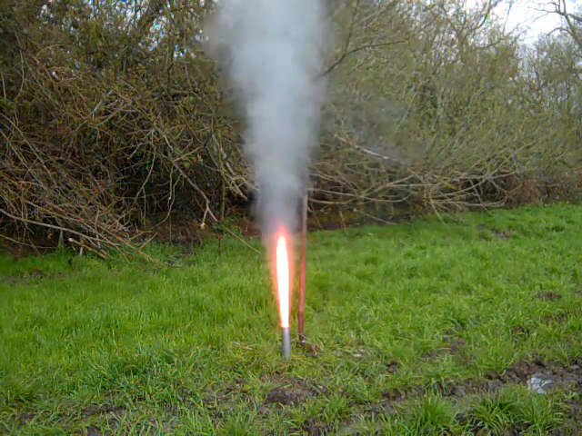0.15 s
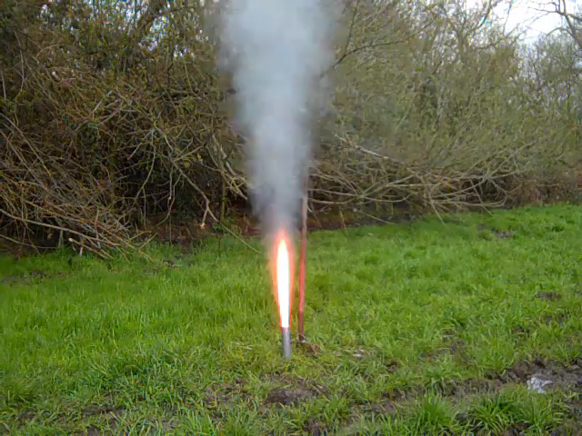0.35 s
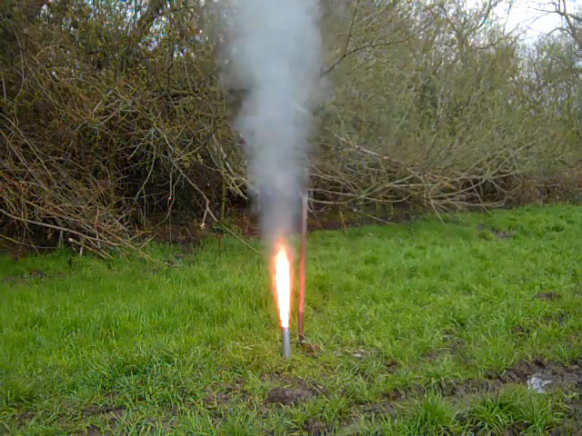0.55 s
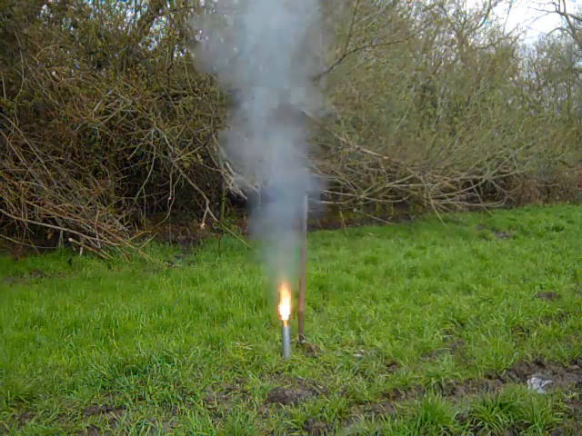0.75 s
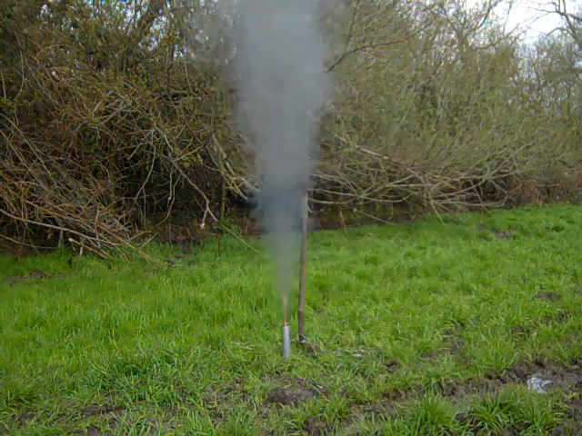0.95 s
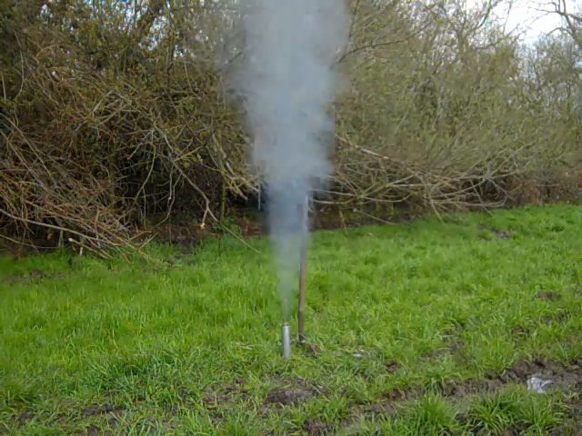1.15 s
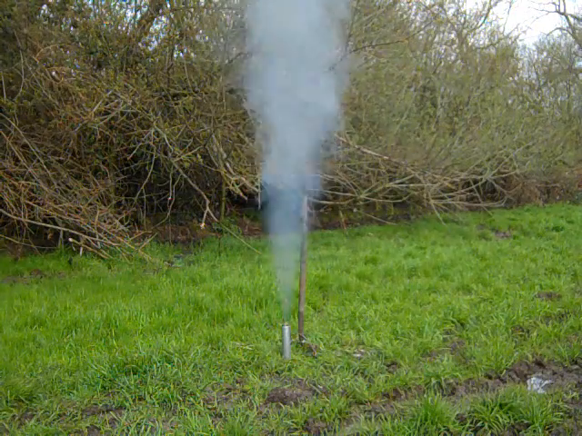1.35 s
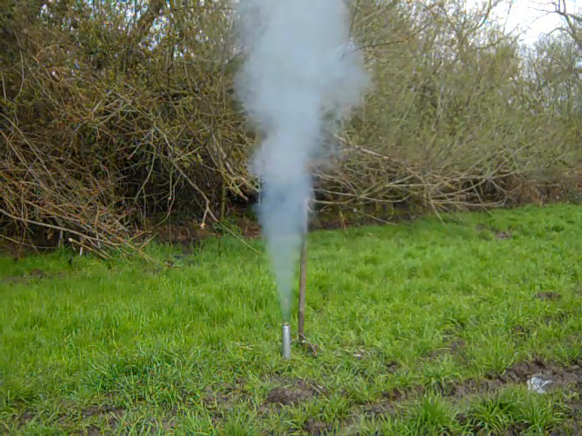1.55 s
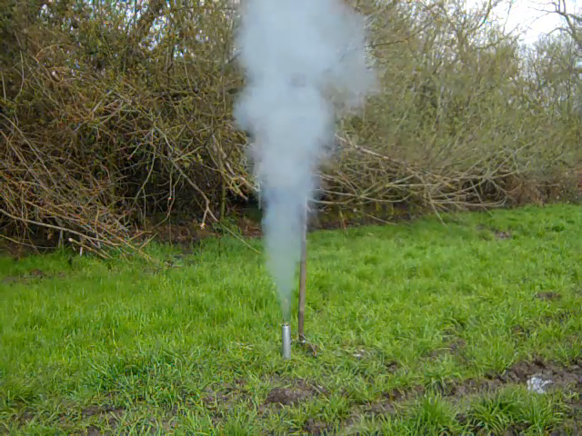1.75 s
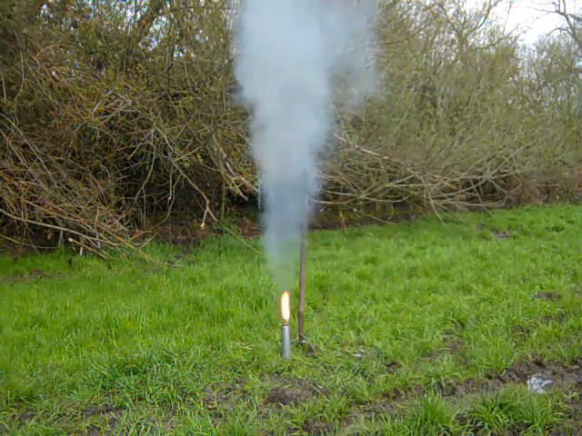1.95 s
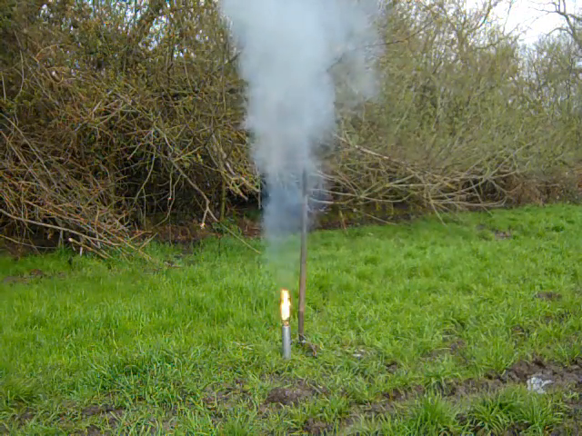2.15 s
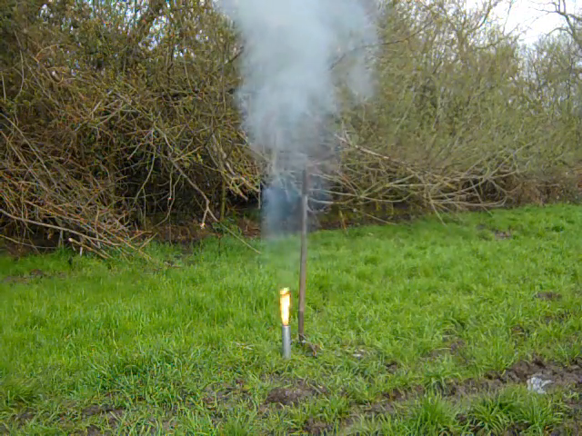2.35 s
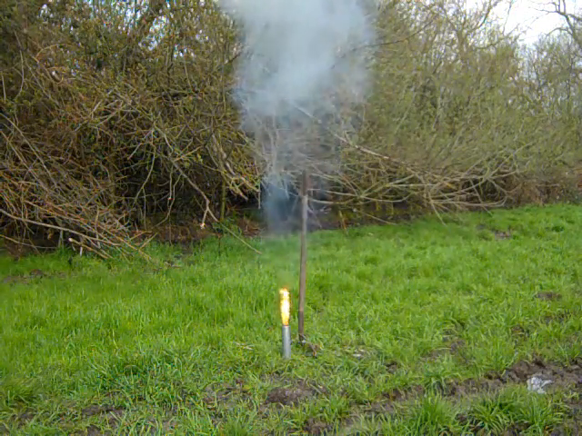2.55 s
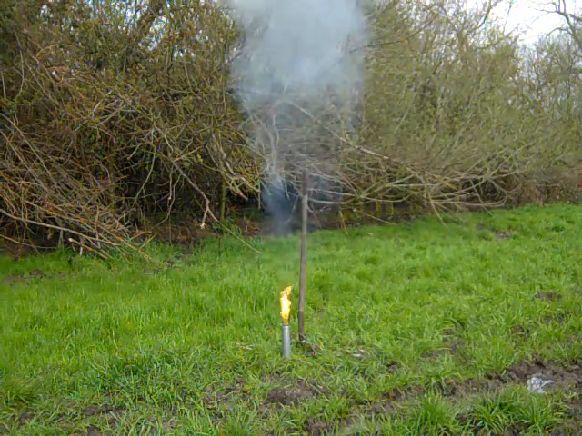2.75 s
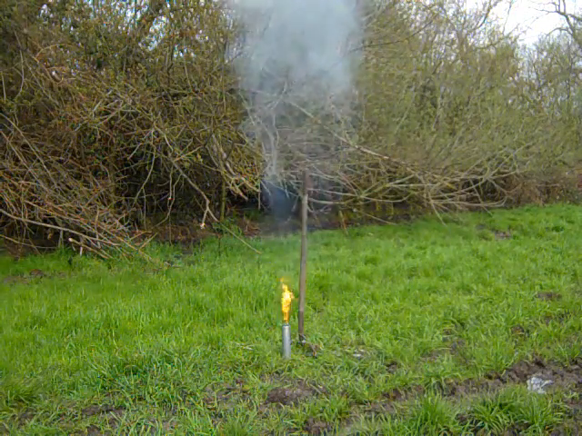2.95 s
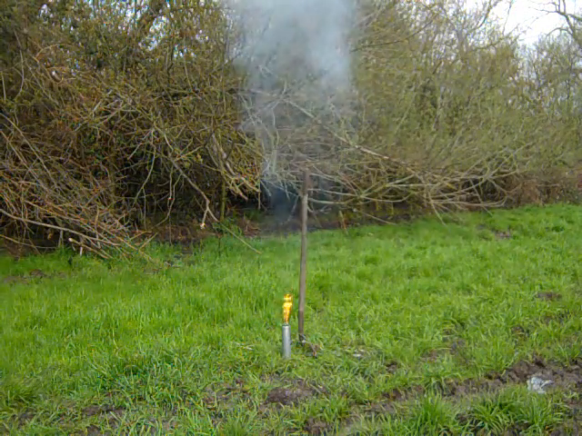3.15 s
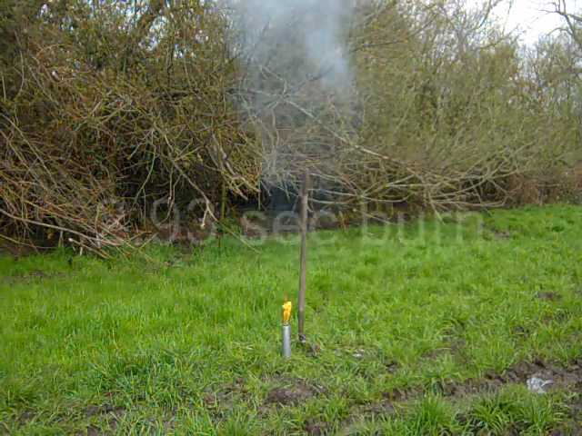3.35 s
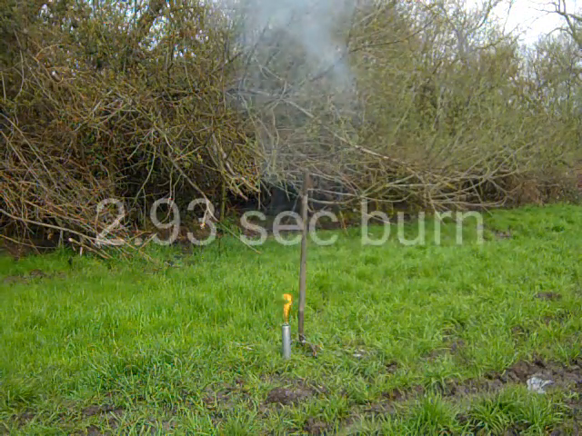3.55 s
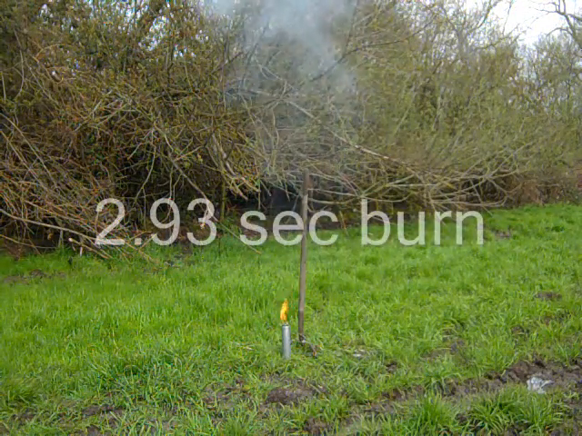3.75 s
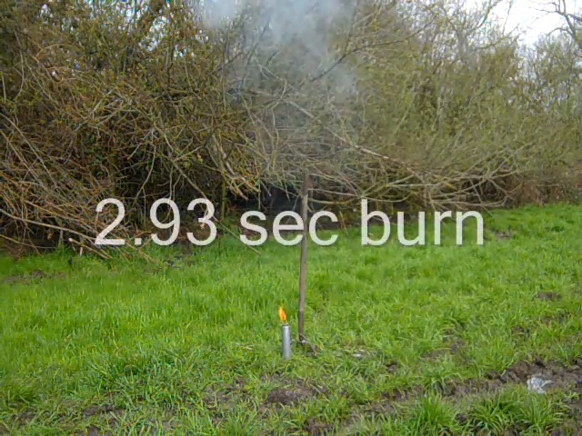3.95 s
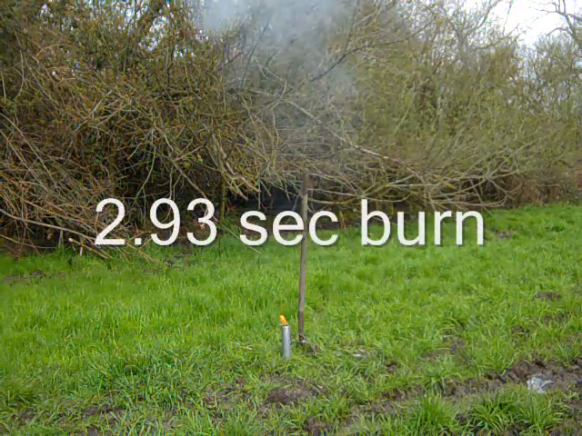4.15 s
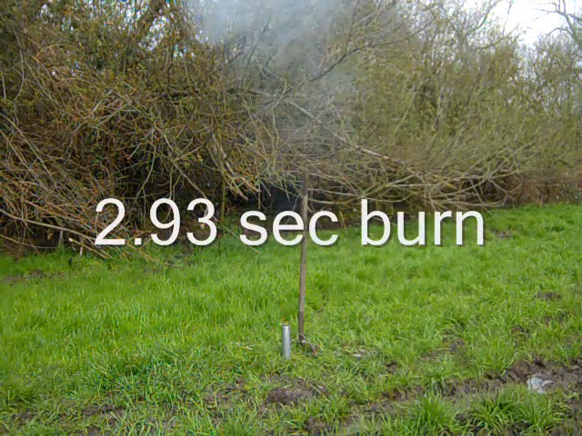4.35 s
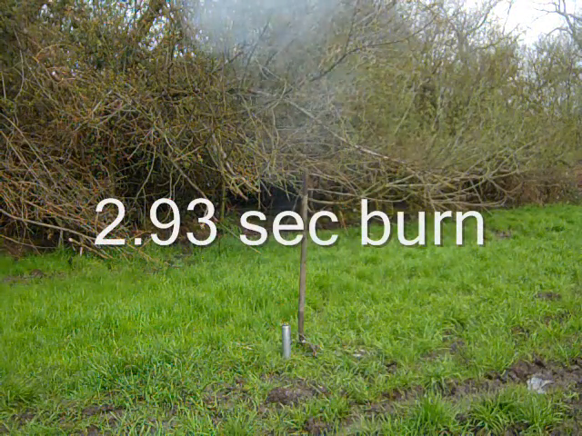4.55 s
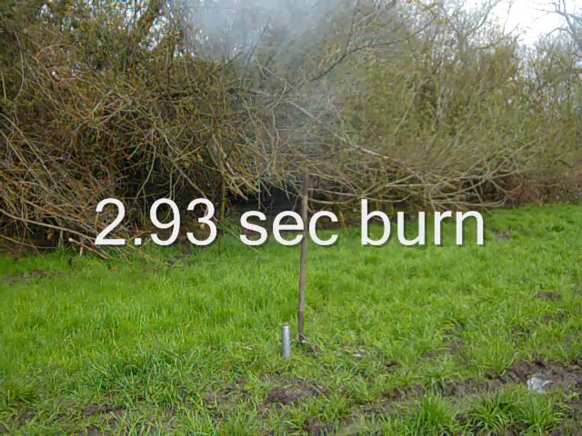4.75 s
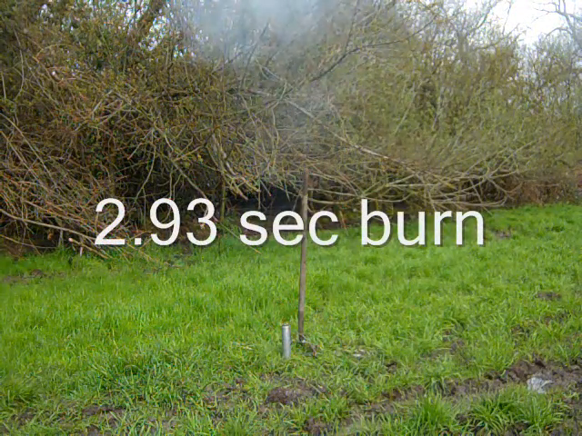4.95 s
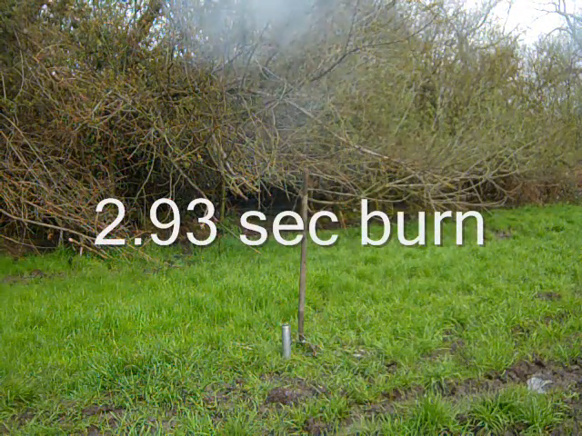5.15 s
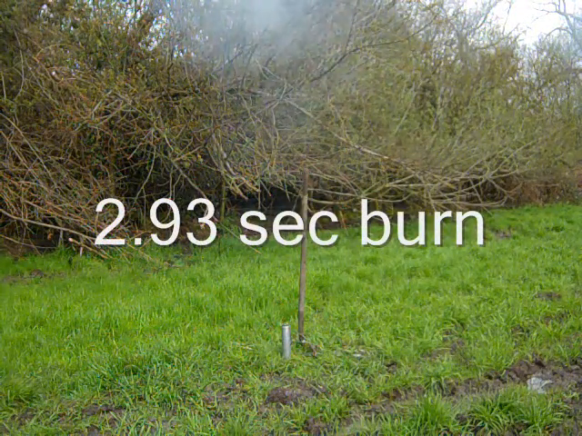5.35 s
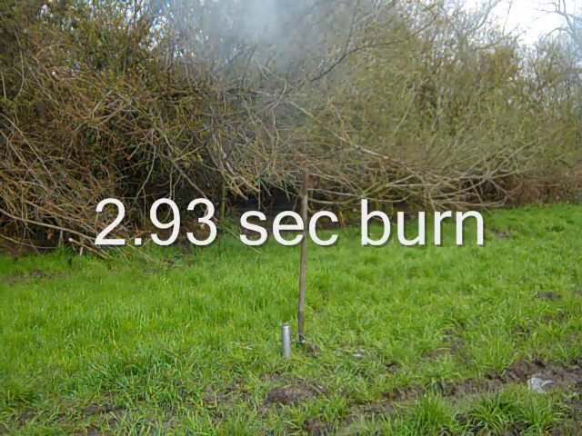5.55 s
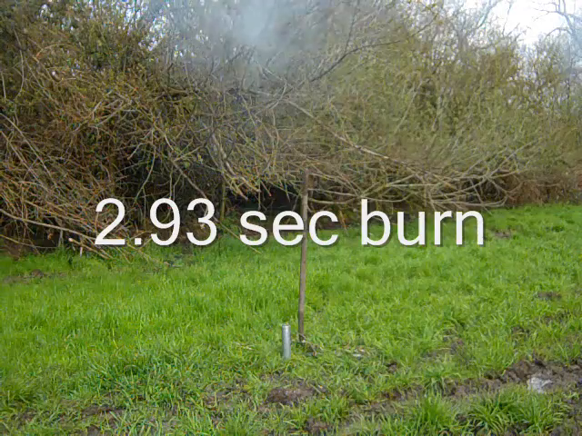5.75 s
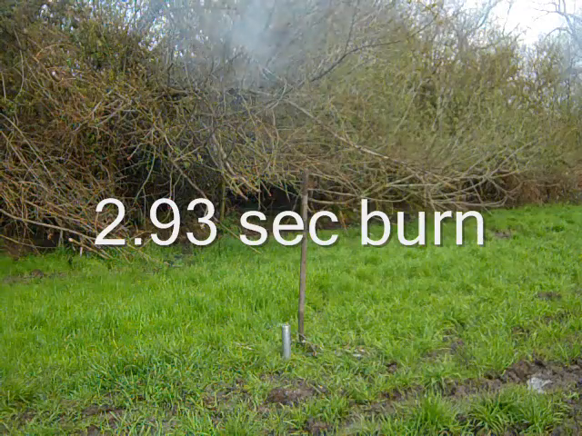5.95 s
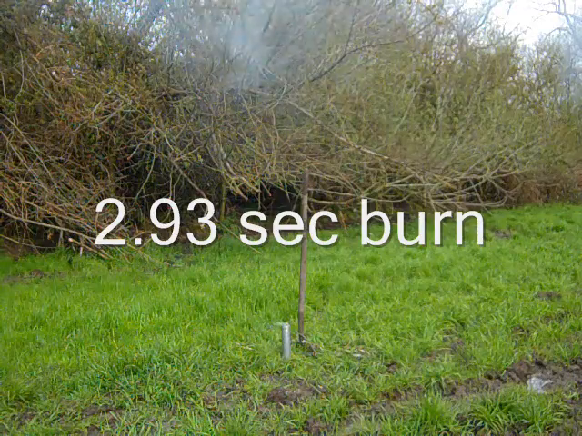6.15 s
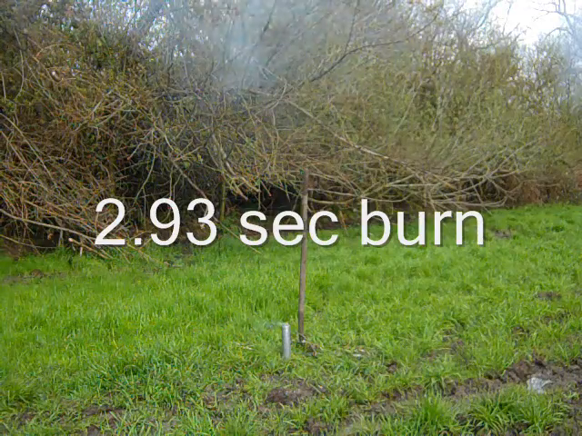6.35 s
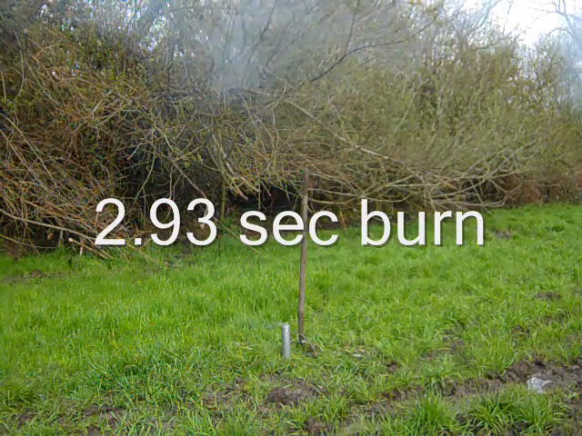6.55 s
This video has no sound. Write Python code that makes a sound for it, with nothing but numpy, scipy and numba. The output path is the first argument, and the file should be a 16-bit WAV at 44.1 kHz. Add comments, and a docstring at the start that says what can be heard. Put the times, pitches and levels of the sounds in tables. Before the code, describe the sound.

Overloaded, crackling jet blast collapses after a second into chuffs and fading hiss, relights with rapid pops, and dwindles into quiet outdoor air.

```python
"""A harsh, overloaded roar comes first: a small solid rocket motor on a stake in a field, some metres from a
pocket camera. The jet is coloured noise under broad, rough overload noise; as it fails it chuffs, then thins to
a hiss with a falling whistle. Leftover gas relights in pops, each one a short puff of pressure. A soft flame
roars in the casing as a stream of small puffs, a few brief hoots follow, and the quiet noise of the field stays."""
import sys
import numpy as np
from scipy import signal
from scipy.fft import rfft, irfft
from scipy.io import wavfile
from scipy.ndimage import uniform_filter1d
from numba import njit

SR = 44100
rng = np.random.default_rng(int(sys.argv[2]) if len(sys.argv) > 2 else 0)


def int16_out(signal):
    """Quantize to a 16-bit WAV file."""
    q = np.round(np.clip(np.atleast_2d(signal).T, -1, 1) * 32767)
    wavfile.write(sys.argv[1], SR, q.astype(np.int16))


N = 291942
HZ = np.maximum(np.fft.rfftfreq(N, 1 / SR), 1)  # every frequency of the spectrum
T = np.arange(N) / SR  # time [s]

# Colour of the quiet field: (frequency [Hz], relative level per Hz [dB])
FIELD_COLOUR = [(25, -8), (60, 0.5), (250, 0.5), (500, -8), (1000, -7), (2000, -12.5), (4000, -19),
                (8000, -21.5), (12000, -30), (20000, -35)]
# How alike left and right hear the field: (frequency [Hz], likeness [0-1])
FIELD_LIKENESS = [(30, .5), (130, 0.97), (290, 0.76), (630, 0.93), (1400, .56), (3000, 0.25), (6500, 0)]
# Short hoots of the last flame in the casing:
# (time of the crest [s], pitch [Hz], level [dB], time from crest to nearly silent [s])
HOOTS = [(3.106, 1460, -40.5, 0.02), (3.262, 1420, -36, 0.011), (3.335, 1430, -55, .05),
         (3.452, 1180, -46, 0.024), (3.477, 1420, -46, 0.018)]
# Level of the lazy flame after relighting: (time [s], level [dB])
FLAME_LEVEL = [(2.0, -48), (2.075, -33), (2.1, -26), (2.2, -21), (2.3, -25), (2.43, -20.5), (2.5, -24),
               (2.6, -24.5), (2.8, -32), (3.07, -43), (3.3, -50.5), (3.9, -60)]
# Chuffs of the failing jet, then relighting pops:
# (time of the crest [s], puff level [dB], strength of the gust of hiss after it [dB])
POPS = [(.99, 2, -20), (1.028, 0, -24), (1.12, -2, -30), (1.172, -8, -30), (1.316, -22, -36),
        (1.797, -37, -28), (1.9024, -1.5, -11), (1.9111, 1, -17), (1.9395, -0.5, -12.5), (1.986, -3.5, -17),
        (2.008, -0.5, -16), (2.024, -4.5, -16.5), (2.032, -21, -17.5), (2.04, -27, -22),
        (2.0539, -1.5, -22), (2.0607, -14, -26), (2.0846, -11, -39), (2.0896, -6, -20), (2.0962, -3.5, -25),
        (2.108, -13, -23), (2.119, -8, -27), (2.125, -13, -32), (2.136, -12, -28), (2.147, -16, -36),
        (2.156, -12.5, -27), (2.1968, -14, -24), (2.236, -10, -22), (2.2537, -15, -35), (2.259, -12.5, -34),
        (2.897, -34, -38), (2.946, -32, -58), (2.973, -33, -59), (3.03, -31, -56), (3.068, -36, -56),
        (3.17, -37, -60), (3.207, -36, -60)]
# Tones the casing tube favours: (frequency [Hz], width of one pass of the filter [Hz], relative level [dB])
CASING_MODES = [(1380, 300, -8.5), (2024, 700, -0.5), (2660, 590, -1.5), (3420, 740, -11),
                (5100, 1800, -9.5)]
# Colour of the rough overload noise, near flat up to the treble: (frequency [Hz], relative level per Hz [dB])
OVERLOAD_COLOUR = [(25, 5.5), (300, 5.5), (1000, 2), (3000, -1), (6000, -29.5)]
# Colour of the jet's hiss: (frequency [Hz], relative level per Hz [dB])
JET_COLOUR = [(300, -24.5), (1200, -21), (2000, -14.5), (2500, -12), (3500, -9.5), (4500, -11), (6000, -5),
              (7500, -3.5), (10000, -9), (14000, -3.5), (20000, 1)]
# How alike left and right hear the jet: (frequency [Hz], likeness [0-1])
JET_LIKENESS = [(300, 1), (3000, 0.6), (7500, 0.98), (11000, 0.39), (14000, .1)]
# Jet level: it climbs to full thrust, drops, swells briefly and dies: (time [s], level [dB])
JET_LEVEL = [(0, 12.5), (.4, 13.5), (.85, 21.5), (.95, 13.5), (1.06, 5.5), (1.19, 2.5), (1.26, -5),
             (1.4, -9.5), (1.7, -12), (1.89, -14), (1.92, -16.5), (2.075, -27), (2.25, -26.5),
             (2.43, -20.5), (2.6, -27), (2.7, -34), (2.8, -55), (3.5, -81)]
# The right microphone port is shaded: (frequency [Hz], loss below the left [dB])
RIGHT_LOSS = [(60, 7.5), (110, 4.5), (200, 5), (380, 5.5), (690, 4.5), (1270, 5), (2340, 7), (4320, 6.5),
              (7950, 11), (14600, 15)]

FIELD_DB = -46.5
RELIGHT_S = 1.9  # the flame moves into the casing
# time scale of a pop; pops are sharp until a moment, then get rounder; each gust dies away
POP_MS, POP_SHARP_UNTIL_S, POP_ROUNDING_S, GUST_DECAY_S = 2.98, 2.005, 0.16, 0.0088
THUD_MS, THUD_DB = 10, -18  # the slow push of air under each pop; level beside the puff
# the nozzle pitch sinks steadily to its rest as the pressure drains
NOZZLE_START_S, NOZZLE_START_HZ, NOZZLE_REST_HZ, NOZZLE_SAG_HZ_PER_S = 1.105, 9700, 7100, 7300
WHISTLE_DB, WHISTLE_SAG_DB_PER_S, WHISTLE_END_S, WHISTLE_EDGE_S = -7, 60, 1.2, 0.018
SMEAR_DB, SMEAR_SAG_DB_PER_S, SMEAR_END_S, SMEAR_EDGE_S = -10, 6, 2, 0.05  # level beside the jet
# casing level beside the jet, before and after it warms; warming time; ceiling
CASING_COLD_DB, CASING_LIT_DB, CASING_WARMS_S, CASING_TOP_DB = -14.5, -2, 0.39, -13
CASING_FLAME_DB = -16.5  # beside the flame
# overload noise at full thrust; its change in dB per dB of jet; its delay behind the jet
OVERLOAD_DB, OVERLOAD_SLOPE, OVERLOAD_LAG_S = 3.5, 1.24, 0.045
# jet at full thrust; jet level under which the overload noise collapses; extra fall in dB per dB
FULL_DB, COLLAPSE_BELOW_DB, COLLAPSE_SLOPE = 18.5, 2, 1.5
PORT_HZ, PORT_WIDTH, PORT_DB = 7810, 960, 8.5  # resonance added by the port [Hz, Hz, dB]
TOP_HZ = 14200  # the camera keeps nothing much above this


def undb(db):
    """Turn decibels into a plain multiplier."""
    return 10 ** (np.asarray(db) / 20)


def unit(x):
    """Scale a sound to an average strength (rms) of 1."""
    return x / np.sqrt(np.mean(x ** 2))


def over_hz(table):
    """Read a (frequency, value) table at every frequency, on a logarithmic pitch scale."""
    hz, value = np.transpose(table)
    return np.interp(np.log(HZ), np.log(hz), value)


def air(gain, alike):
    """Coloured noise in left and right, alike by the given share, rms 1."""
    shared, opposed = (rfft(rng.standard_normal(N)) * gain for _ in range(2))
    likeness = np.clip(alike, 0, 1)
    sides = np.array([[1], [-1]])
    spectrum = np.sqrt(1 + likeness) * shared + np.sqrt(1 - likeness) * opposed * sides
    return unit(irfft(spectrum, N))


def ring(hz, width):
    """Frequency response of one resonance, with gain 1 at its centre."""
    return 1 / (1 + 1j * (HZ - hz ** 2 / HZ) / width)


def walk(rate):
    """Random wandering: levels held 1 / rate s, then smoothed twice; rms 1."""
    hold = int(SR / rate)
    steps = np.repeat(rng.standard_normal(N // hold + 1), hold)
    return unit(uniform_filter1d(uniform_filter1d(steps, hold), hold)[:N])


def gate(start_s, end_s, edge_s):
    """Fade in over the edge after the start, hold, fade out over the edge after the end."""
    return np.clip(np.minimum(T - start_s, end_s + edge_s - T) / edge_s, 0, 1) ** 2


def puff(scale_ms, sharp):
    """A sharp puff climbs to a crest, drops and swings under; a soft one is a single round cycle."""
    crest = 441  # samples before the crest
    u = np.arange(-crest, 882) / SR / (scale_ms / 1000)
    after = np.maximum(u, 0)
    rise = np.exp(np.minimum(u, 0) / 0.2)
    swing = np.exp(-after / 0.85) * np.cos(np.pi * after ** 0.6 * 1.6)
    soft = 1.5 * np.cos(np.pi * u / 0.52) * np.exp(-((u - 0.3) / 0.46) ** 2)
    return sharp * rise * swing + (1 - sharp) * soft, crest


def field():
    """The quiet of the field: soft coloured noise whose level wanders slightly."""
    return air(undb(over_hz(FIELD_COLOUR)), over_hz(FIELD_LIKENESS)) * undb(FIELD_DB + 0.41 * walk(9))


def hoots():
    """Brief wavering swells of the casing's lowest tone over a faint breathy band."""
    waver = 2 * np.pi * np.cumsum(60 * walk(150)) / SR
    tones = 0
    for s, hz, db, length in HOOTS:
        swell = undb(db) * np.exp(-((T - s) / length) ** 2 * 4)
        tones = tones + swell * np.sin(2 * np.pi * hz * T + waver)
    breath_level = undb(-57 + 3.0 * walk(24.1)) * np.exp(-((T - 3.2) / 0.32) ** 2)
    return tones + air(ring(1360, 220) ** 2, 0.8) * breath_level


def flame():
    """The lazy flame burns in a dense random stream of small uneven puffs, over soft bands of noise."""
    when, size = rng.random((3000, 2)).T
    seeds = np.zeros(N)
    seeds[(when * N).astype(int)] = undb(6.5 * size)
    puffs = unit(signal.fftconvolve(seeds, puff(3.7, 0.38)[0])[:N])
    soft = ring(262, 410)
    burn = irfft(rfft(puffs) * soft, N) + undb(-1.5) * air(soft, 1.0)
    burn = burn + undb(-8.0) * air(ring(780, 840), 0.83)
    burn = burn + undb(-13.5) * air(ring(89, 90), 0.9)
    return unit(burn)


def pops():
    """Each chuff or relighting is one puff, rounder as the gas runs out, with a dying gust of hiss."""
    thumps, gust = np.zeros(N + 2000), np.zeros(N)  # spare room for the last puff's tail
    thud = undb(THUD_DB) * puff(THUD_MS, 0)[0]
    for s, db, gust_db in POPS:
        sharp = min(1, np.exp(-(s - POP_SHARP_UNTIL_S) / POP_ROUNDING_S))
        shape, crest = puff(POP_MS, sharp)
        start = int(s * SR) - crest
        thumps[start:start + len(shape)] += undb(db) * (shape + thud)
        gust += undb(gust_db) * (T > s) * np.exp(-np.maximum(T - s, 0) / GUST_DECAY_S)
    return thumps[:N], gust


def casing(steady, gust):
    """Gas hisses in the tube's tones, each fluttering alone; the flame inside brings out the lowest two."""
    hiss = 0
    for k, (hz, width, db) in enumerate(CASING_MODES):
        before_relight = undb(-10.5) if k < 2 else 1
        level = undb(db + 2.0 * walk(30.02)) * np.where(T > RELIGHT_S, 1, before_relight)
        hiss = hiss + air(ring(hz, width) ** 2, 0.66) * level
    spit = air(ring(1450, 1900) ** 2, 0.9)
    return unit(hiss) * (steady + 0.5 * gust) + 0.8 * spit * gust


def nozzle_hz():
    """Pitch of the nozzle over time: it slides down to a resting pitch."""
    sliding = NOZZLE_START_HZ - NOZZLE_SAG_HZ_PER_S * (T - NOZZLE_START_S)
    return np.clip(sliding, NOZZLE_REST_HZ, NOZZLE_START_HZ)


def whistle():
    """A thin, breathy tone: a sine at the falling nozzle pitch, with pitch and level shaking at random."""
    tone = np.sin(2 * np.pi * np.cumsum(nozzle_hz() + 45 * walk(300)) / SR)
    sag_db = WHISTLE_SAG_DB_PER_S * np.clip(T - NOZZLE_START_S, 0, 1)
    level = undb(WHISTLE_DB - sag_db + 2.5 * walk(80.5))
    return np.sqrt(2) * tone * level * gate(NOZZLE_START_S, WHISTLE_END_S, WHISTLE_EDGE_S)


def nozzle_smear():
    """The whistle smears into a band of hiss: slow noise lifted to the sinking nozzle pitch."""
    slow = air(ring(1, 700) ** 2, 0.7) + 1j * air(ring(1, 700) ** 2, 0.89)
    band = np.real(slow * np.exp(2j * np.pi * np.cumsum(nozzle_hz()) / SR))
    level = undb(SMEAR_DB - SMEAR_SAG_DB_PER_S * np.clip(T - WHISTLE_END_S, 0, 1))
    return band * level * gate(WHISTLE_END_S, SMEAR_END_S, SMEAR_EDGE_S)


def overload_noise(late_jet_db):
    """Broad rough noise, nearly unrelated left and right, rises with the loud jet and collapses as it weakens."""
    collapse_db = COLLAPSE_SLOPE * np.minimum(late_jet_db - COLLAPSE_BELOW_DB, 0)
    level_db = OVERLOAD_DB + OVERLOAD_SLOPE * (late_jet_db - FULL_DB) + collapse_db
    return air(undb(over_hz(OVERLOAD_COLOUR)), 0.12) * undb(level_db + 2.25 * walk(22.1))


def jet(jet_db):
    """Gas rushing from the nozzle: fluttering hiss that loses its top once the pressure is low."""
    hiss = air(undb(over_hz(JET_COLOUR)), over_hz(JET_LIKENESS)) + nozzle_smear()
    hiss = hiss * undb(jet_db + 0.47 * walk(24.93))
    top = irfft(rfft(hiss) / (1 + (10500 / HZ) ** 8), N)
    return hiss - 0.5 * np.clip((7 - jet_db) / 24, 0, 1.6) * top


def scene():
    """Add up all sources; the jet level also drives the overload noise and, with the flame, the casing."""
    s, db = np.transpose(JET_LEVEL)
    jet_db = np.interp(T, s, db, right=-120)
    late_jet_db = np.interp(T - OVERLOAD_LAG_S, s, db, right=-120)
    flame_db = np.interp(T, *np.transpose(FLAME_LEVEL), left=-120, right=-120)
    thumps, gust = pops()
    # the tube follows the jet, more strongly once the flame has moved into it
    beside_db = np.interp(T, [RELIGHT_S, RELIGHT_S + CASING_WARMS_S], [CASING_COLD_DB, CASING_LIT_DB])
    tube = undb(np.minimum(jet_db + beside_db, CASING_TOP_DB)) + undb(flame_db + CASING_FLAME_DB)
    # after relighting, each gust also fans the flame
    burn = flame() * (undb(flame_db + 1.3 * walk(30.02)) + 0.69 * gust * (T > RELIGHT_S))
    background = field() + hoots() + burn + thumps
    return background + casing(tube, gust) + whistle() + overload_noise(late_jet_db) + jet(jet_db)


@njit
def follow(x, attack, release):
    """Track loudness: climb fast and sink slowly."""
    out, e = np.empty(len(x)), np.mean(x[:2000])
    for i in range(len(x)):
        e += (x[i] - e) * (attack if x[i] > e else release)
        out[i] = e
    return out


def record(dry):
    """Resonant ports, a lopsided preamplifier that clips, a dull top, slow gain control, hiss, top cut."""
    port = 1 + undb(PORT_DB) * ring(PORT_HZ, PORT_WIDTH)
    # the right port also hears everything 0.71 samples later
    shade = undb(-over_hz(RIGHT_LOSS)) * np.exp(-2j * np.pi * HZ * 0.71 / SR)
    heard = irfft(rfft(dry) * port * np.array([np.ones_like(shade), shade]), N)
    # uneven limits rectify the hiss, so overload spreads it down to the bass
    bent = heard + np.array([[-0.03], [0.06]]) * np.minimum(heard ** 2, 1)
    clipped = np.clip(bent, [[-1.3], [-1.1]], [[1.15], [1.3]])
    dull = signal.sosfilt(signal.butter(2, [12, 10500], "band", fs=SR, output="sos"), clipped)
    # the louder side sets the gain for both
    loud = follow(np.abs(dull).max(0), 1 / (0.15 * SR), 1 / (0.4 * SR))
    gain = np.minimum(1, undb(-10) / loud) ** 0.93
    hiss = undb(-65) * rng.standard_normal(dry.shape)
    out = np.clip(dull * gain + hiss, -1, 1)
    return signal.sosfilt(signal.ellip(12, 0.2, 70, TOP_HZ, fs=SR, output="sos"), out)


dry = scene()
out = record(dry)
int16_out(out)
```